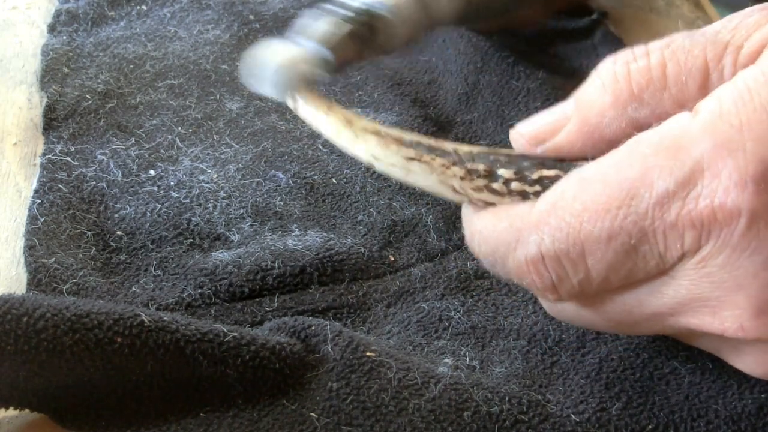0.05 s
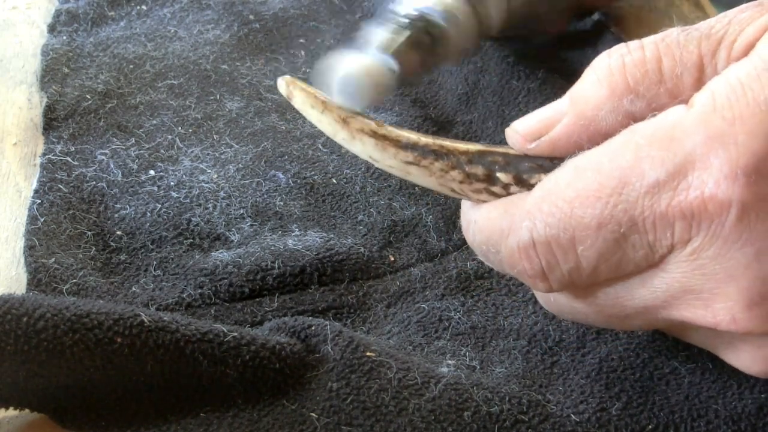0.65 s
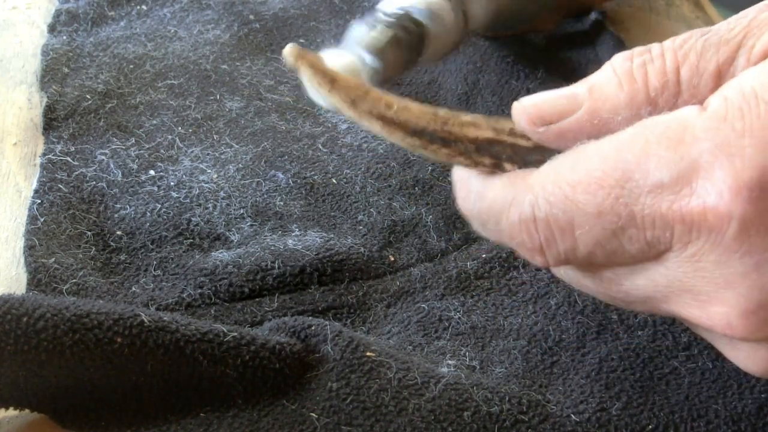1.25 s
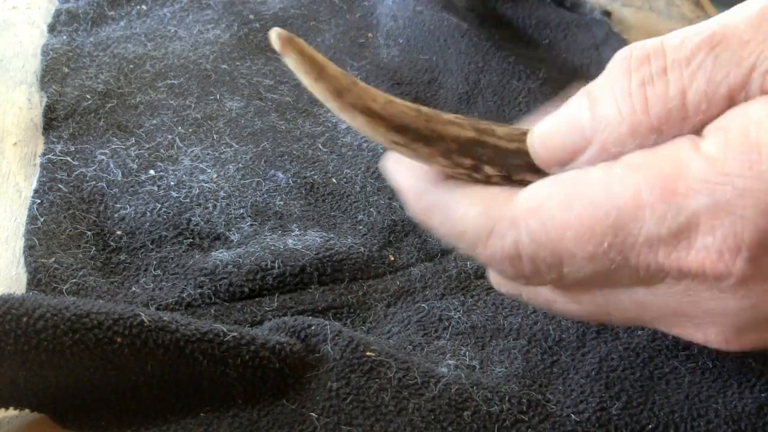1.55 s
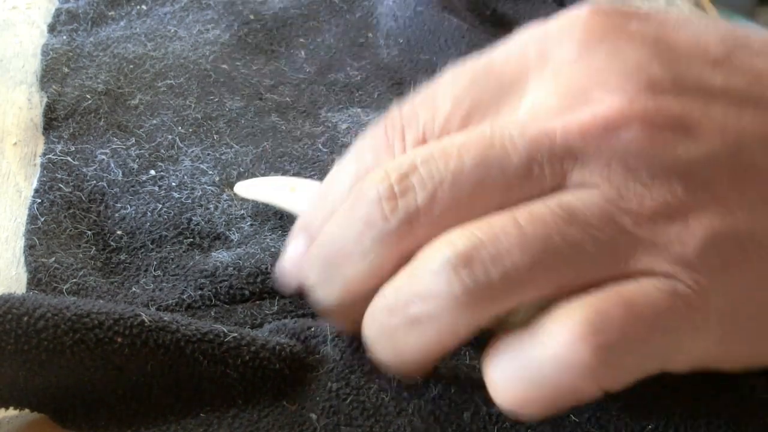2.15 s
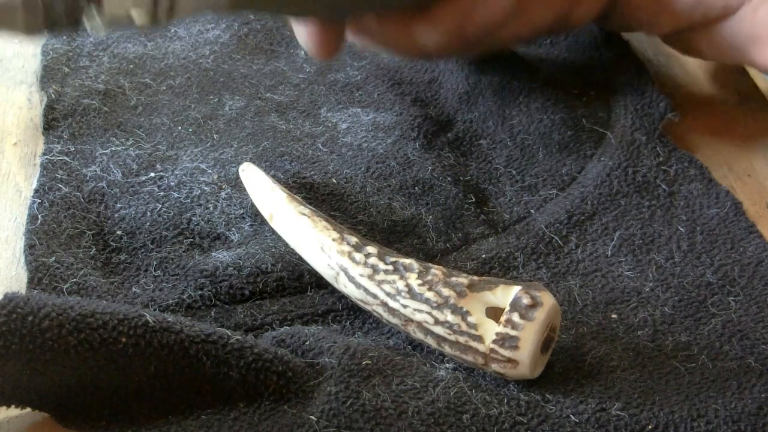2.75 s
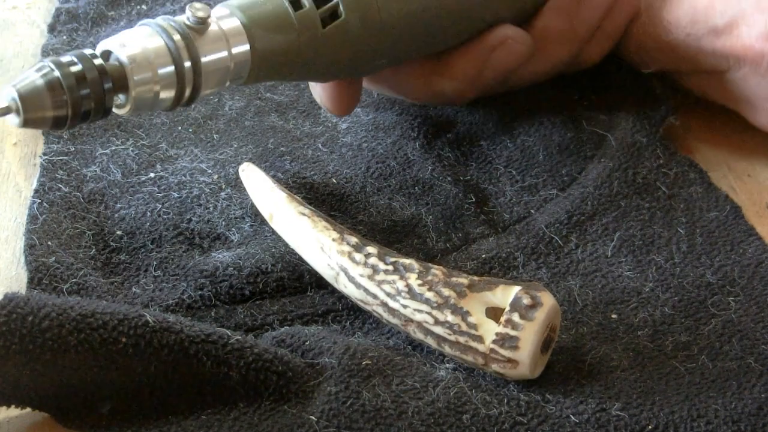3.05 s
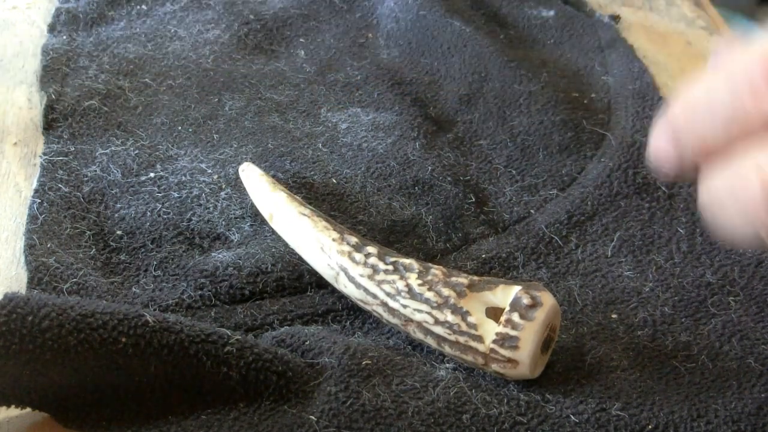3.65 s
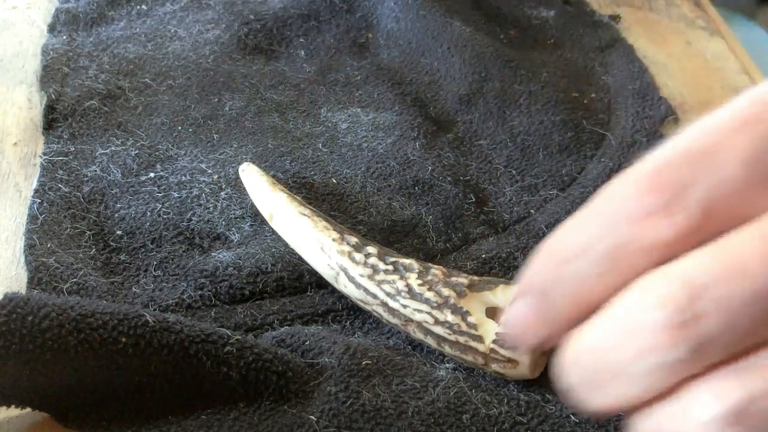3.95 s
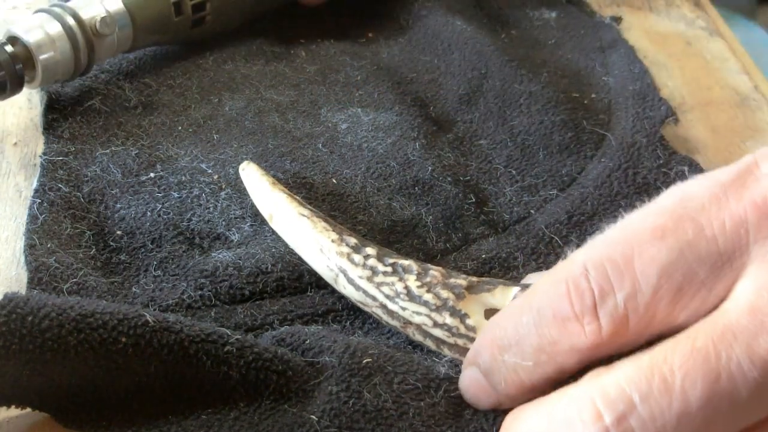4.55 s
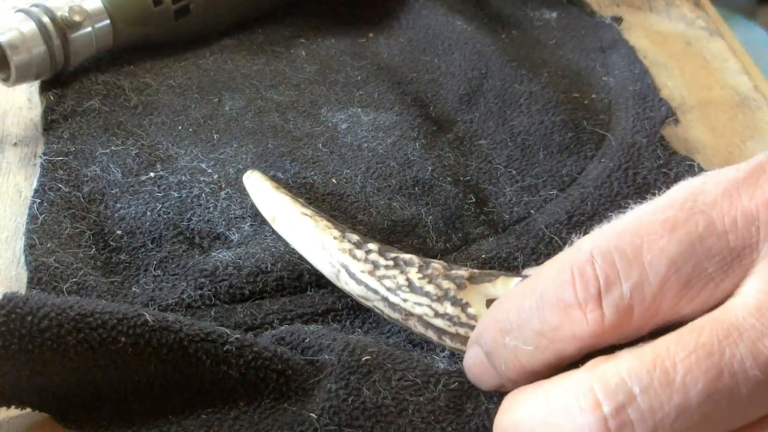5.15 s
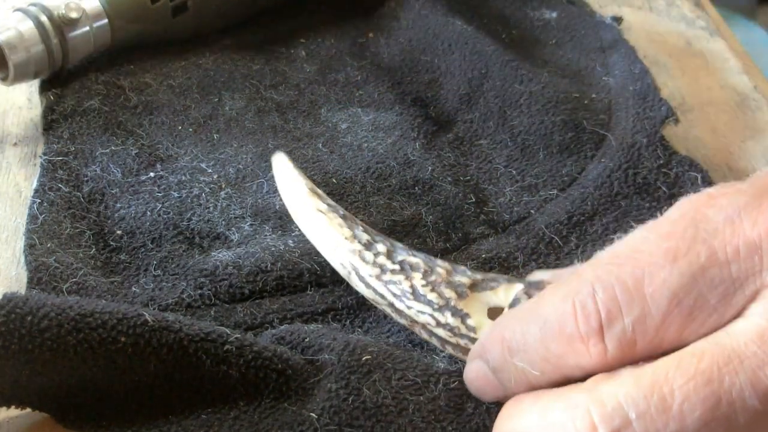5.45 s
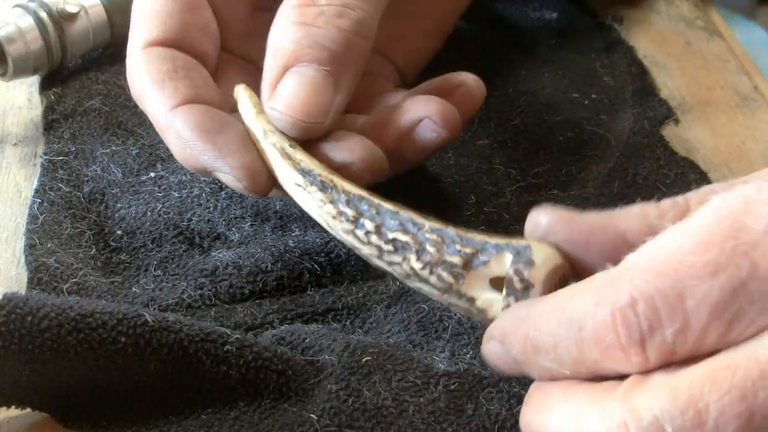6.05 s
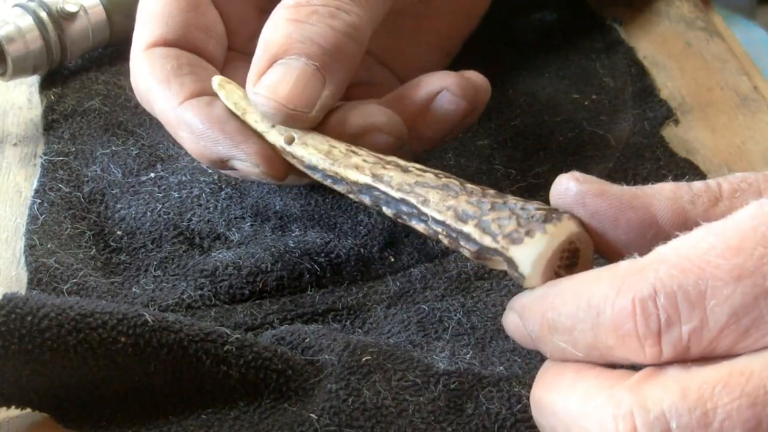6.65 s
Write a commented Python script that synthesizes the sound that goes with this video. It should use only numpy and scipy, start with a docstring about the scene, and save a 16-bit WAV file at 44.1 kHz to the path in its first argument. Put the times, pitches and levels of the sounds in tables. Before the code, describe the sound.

A small handheld rotary tool whines steadily with an electric buzz, its bit scraping against antler. It is lifted off and keeps running free while the antler is put down with a few soft knocks on a padded bench. A switch snaps, and the motor coasts to a stop, its whine sliding down over a fading rattle. A soft bump and a faint tick follow. Heard close in a quiet room.

```python
"""A small rotary tool grinds an antler tip: rotor whine, mains buzz, scraping bit, cooling air.
By 2 s it is lifted off and runs free; the antler is put down on a padded bench, whose top rings.
At 3.07 s the switch snaps off. The rotor coasts to rest, its loose shaft knocking and the
commutator's whine sliding down through the housing's resonances.
At 5.3 s the antler is picked up in the quiet room; at 6.7 s a fingernail ticks on it."""
import sys
import numpy as np
from scipy import signal
from scipy.fft import rfft, irfft, next_fast_len
from scipy.io import wavfile

SR = 44100
rng = np.random.default_rng(int(sys.argv[2]) if len(sys.argv) > 2 else 0)


def dump_mix(stems):
    """Bounce the given channels to the path in sys.argv[1] as a 16-bit WAV at rate SR."""
    frames = np.atleast_2d(stems).T  # one column per channel
    limited = np.clip(frames, -1, 1)  # hard clip at full scale
    pcm = np.round(limited * 32767).astype(np.int16)
    wavfile.write(sys.argv[1], SR, pcm)


N = 305158
TIME = np.arange(N) / SR
SWITCH_S = 3.0672


def from_db(db):
    """Decibels to gain."""
    return 10 ** (np.asarray(db) / 20)


def rms_one(x):
    """Scale to rms 1."""
    return x / np.sqrt(np.mean(x ** 2) + 1e-20)


def in_time(rows):
    """Each column after t/s, interpolated to every sample."""
    t_s, *columns = np.transpose(rows)
    return [np.interp(TIME, t_s, column) for column in columns]


def at_hz(spectrum, hz):
    """Level/dB of a spectrum, interpolated over log frequency."""
    points_hz, levels_db = np.transpose(spectrum)
    return np.interp(np.log(np.maximum(hz, 1)), np.log(points_hz), levels_db)


def drift(rate_hz):
    """Straight lines between unit normal draws, rate_hz of them a second."""
    knots = rng.standard_normal(4096)
    return np.interp(TIME * rate_hz, np.arange(len(knots)), knots)


def colour(x, spectrum, low_hz=10, high_hz=SR / 2):
    """Filter x by a spectrum between two steep edges; rms 1."""
    size = next_fast_len(N)
    hz = np.arange(size // 2 + 1) * SR / size + 1
    edges = 1 / np.sqrt((1 + (low_hz / hz) ** 16) * (1 + (hz / high_hz) ** 16))
    shaped = rfft(x, size) * from_db(at_hz(spectrum, hz)) * edges
    return rms_one(irfft(shaped, size)[..., :N])


def stereo_noise(side_db):
    """White mid/side noise; rms 1."""
    mid, side = rng.standard_normal((2, N))
    return rms_one(mid + from_db(side_db) * side * [[1], [-1]])


def ring(force, modes):
    """Damped modes of alternating sign, driven by one force."""
    out = np.zeros(N)
    for k, (hz, db, t60_s) in enumerate(modes):
        radius, angle = from_db(-60 / (t60_s * SR)), 2 * np.pi * hz / SR
        poles = [1, -2 * radius * np.cos(angle), radius ** 2]
        out += (-1) ** k * from_db(db) * signal.lfilter([0, np.sin(angle)], poles, force + 1e-18)
    return out


def clicks(rows, start_s=0):
    """One impulse per row of t/s, level/dB."""
    out = np.zeros(N)
    for t_s, db in rows:
        out[round((start_s + t_s) * SR)] += from_db(db)
    return out


def partial(turns, order, scatter_cycles=1):
    """Sine locked to a multiple of the rotor speed, at a random phase."""
    cycles = (order * turns + scatter_cycles * rng.random()) % 1
    return np.sin((2 * np.pi * cycles).astype(np.float32))


def once_a_turn(turns):
    """Rough waveform that recurs every turn; rms 1."""
    size = 256
    pattern = irfft(np.exp(2j * np.pi * rng.random(size // 2 + 1)))
    return rms_one(np.interp(turns % 1 * size, np.arange(size), pattern))


def rotor():
    """Speed/Hz and turns made: steady under power, then slowed by friction."""
    # rotor speed, driven and coasting: t/s, f/Hz
    driven = [(0.0, 285.8), (0.05, 289.9), (0.1, 294.8), (0.2, 297.7), (0.3, 300.7), (0.4, 303.2),
              (0.5, 302.3), (0.6, 303.5), (0.7, 301.6), (0.8, 300.9), (0.9, 302.6), (1.0, 304.5),
              (1.1, 305.2), (1.2, 302.5), (1.3, 301.9), (1.4, 302.6), (1.5, 303.9), (1.6, 304.7),
              (1.7, 304.8), (1.8, 305.1), (1.9, 305.0), (2.0, 305.3), (2.1, 304.9), (2.2, 304.8),
              (2.3, 304.4), (2.4, 305.2), (2.5, 305.2), (2.6, 305.3), (2.7, 304.8), (2.8, 305.1),
              (2.9, 304.9), (3.0, 305.1), (3.06, 304.1)]
    stopping = [(3.07, 305), (3.2, 276.9), (3.4, 240.1), (3.6, 208), (3.8, 177.5), (4.0, 148.8),
                (4.2, 120.7), (4.4, 94.1), (4.6, 68.7), (4.8, 44.8), (4.95, 27.2), (5.19, 0)]
    speed_hz = np.maximum(in_time(list(driven) + list(stopping))[0], 0)
    return speed_hz, np.cumsum(speed_hz * (1 + 0.00088 * drift(60))) / SR


def rattle(turns, depth, uneven_db):
    """Envelope of the shaft's chatter: a burst each turn, no two alike."""
    strength = from_db(uneven_db * rng.standard_normal(4096))[turns.astype(int)]
    return 1 + depth * strength * np.exp(-(turns % 1) / 0.21)


def whine(turns, load):
    """Rotor orders under power; pressing the bit shifts their balance and makes the shaft flutter."""
    # strongest multiples of the rotor speed: order
    strong_orders = (1, 3, 5, 6, 7, 8, 9, 11, 13, 16)
    # their swell as the tool turns in the hand: t/s, relative level/dB per order
    strong_levels = [(0.0, -46, -46, -52, -36.5, -41, -52, -47, -59, -41, -49),
                     (0.13, -48, -45.5, -53, -35, -39, -39, -38.5, -44, -39, -59),
                     (0.25, -44.5, -40.5, -51, -37, -41, -38.5, -42, -60, -38.5, -41),
                     (0.38, -52, -36, -36, -37, -39, -32, -45, -41, -38, -47),
                     (0.51, -49.5, -39, -56, -37.5, -39, -31, -41, -44, -39.5, -51),
                     (0.63, -47, -38.5, -49, -33.5, -36, -31.5, -45, -43, -36, -42),
                     (0.76, -52, -40, -50, -38, -38.5, -44, -48, -42, -37.5, -46),
                     (0.89, -52.5, -37, -45, -40, -49, -33, -44, -43, -40, -47),
                     (1.01, -51, -38.5, -45, -36.5, -39, -35.5, -42, -43, -36, -37),
                     (1.14, -43, -37.5, -58, -35, -39, -33.5, -40, -42, -39.5, -57),
                     (1.27, -47, -38, -44, -43, -35, -33.5, -40, -43, -45, -42),
                     (1.39, -47, -38.5, -45, -44, -36, -36, -42, -40, -44, -52),
                     (1.52, -56, -42.5, -41, -42, -47, -35.5, -36.5, -37, -48, -61),
                     (1.65, -50, -40, -43, -42, -41, -34.5, -40, -37, -44, -58),
                     (1.77, -50, -43, -39.5, -47, -44, -33.5, -40.5, -44, -36, -44),
                     (1.9, -55, -42, -35.5, -45, -43, -32.5, -39, -41, -37.5, -42),
                     (2.03, -50, -43.5, -36.5, -50, -43, -31, -33.5, -40, -37, -39.5),
                     (2.15, -48, -43.5, -36.5, -49, -49, -29.5, -33, -39, -39, -44),
                     (2.28, -49, -43.5, -37, -51, -56, -31.5, -31.5, -43, -37.5, -41),
                     (2.41, -53, -43, -34.5, -45, -44, -34, -31, -38, -38, -36),
                     (2.53, -53, -43, -35, -46, -42, -31, -34, -40, -37, -35.5),
                     (2.66, -51.5, -39.5, -34.5, -45, -40, -34.5, -34, -36.5, -39, -37.5),
                     (2.79, -47, -41.5, -33, -45.5, -40, -33, -30.5, -37, -49, -39.5),
                     (2.91, -49, -42, -33.5, -35.5, -43, -42, -37, -45, -50, -43),
                     (3.04, -48, -44, -34, -44, -42, -53, -39, -45, -49, -51)]
    # weaker multiples: order, relative level/dB loaded, relative level/dB free
    weak_orders = [(2, -49.5, -53), (4, -48, -50), (10, -59, -50.5), (12, -40.5, -44), (14, -44, -44.5),
                   (15, -46, -49.5), (17, -49.5, -48.5), (18, -54.5, -53.5), (19, -52, -50.5),
                   (20, -55.5, -61), (21, -55, -63.5), (23, -64, -61), (24, -64, -52), (26, -67, -57),
                   (30, -60, -67), (32, -55, -53), (33, -51, -45), (34, -63, -59), (35, -57, -63),
                   (36, -53.5, -54.5), (37, -58.5, -53), (38, -51.5, -63), (39, -69, -59), (40, -75, -48.5),
                   (42, -62, -62.5), (47, -65.5, -61), (48, -54, -56), (49, -61.5, -52)]
    out = 0
    for order, db in zip(strong_orders, in_time(strong_levels)):
        depth = (0.62 if order == 1 else 0.15) * load  # the imbalance tone flutters most
        flutter = (1 + depth * drift(55)) / np.sqrt(1 + depth ** 2 / 2)
        out += from_db(db + 2.06) * flutter * partial(turns, order)
    for order, loaded_db, free_db in weak_orders:
        db = load * loaded_db + (1 - load) * free_db + 1.04 + 3.5 * drift(9)
        out += from_db(db) * partial(turns, round(order), scatter_cycles=0.52)
    return out


def powered_tool(turns):
    """Scrape of bit and bearings, hiss of cooling air, mains buzz and hum, plus the whine."""
    # pressure of bit on antler: t/s, load/0-1
    pressure = [(0, 0.98), (1.33, 1), (1.48, 0.73), (1.75, .1), (2.0, 0.05)]
    # noise swells, grinding first, then running free: t/s, relative level/dB of scrape, rasp, hiss
    scraping = [(0.02, -39.5, -38.5, -43), (0.07, -41.5, -38, -46), (0.12, -42, -44, -46),
                (0.17, -42, -44, -44), (0.22, -46, -47, -47), (0.27, -46, -43.5, -43.5),
                (0.32, -45, -51, -43), (0.37, -43, -40, -41), (0.42, -40, -52, -45.0),
                (0.47, -41, -44, -43.5), (0.52, -39.0, -36, -42), (0.57, -41, -40.0, -41.5),
                (0.62, -41.5, -42, -41.5), (0.67, -43, -44, -41), (0.72, -39, -39, -42),
                (0.77, -38.5, -41.5, -41), (0.82, -37, -43, -44.5), (0.87, -58, -47, -44.5),
                (0.92, -38, -43, -42), (0.97, -41, -39, -43), (1.02, -41.5, -39, -40.5),
                (1.07, -40.5, -40, -41.5), (1.12, -41.5, -58, -44.5), (1.17, -39.5, -34.5, -40),
                (1.22, -43, -44.5, -41.5), (1.27, -42, -41, -41), (1.32, -39.5, -38.5, -42),
                (1.37, -47, -51, -45), (1.42, -40.5, -50.5, -45.0), (1.47, -45, -44, -45.5),
                (1.52, -42.5, -43, -45.0), (1.57, -47, -43, -45.5), (1.65, -42, -47.5, -46.5),
                (1.74, -44, -41, -44), (1.83, -40, -44, -45.5), (1.92, -43, -44, -43),
                (2.01, -39, -42.5, -44.5), (2.1, -39, -47.5, -46), (2.19, -40.5, -43, -45.5),
                (2.28, -37, -43, -46.5), (2.37, -43.5, -40.5, -45.0), (2.46, -40, -39.5, -46.5),
                (2.55, -38.5, -39.5, -43.5), (2.64, -37.5, -43, -45.5), (2.73, -41, -39.5, -41),
                (2.82, -38.5, -44.5, -44), (2.91, -39.5, -43.5, -43), (3.0, -41, -38, -45.0)]
    # noise spectra, grinding and running free: f/Hz, level/dB
    grinding = [(150, -5), (450, -22), (750, -10.5), (1150, -12.5), (1600, -6.5), (2050, 3.5), (2500, -5),
                (3200, -6), (3900, -2), (5500, -9), (7400, -8.5), (8600, -17), (10300, -7), (15000, -12)]
    free = [(150, -17.5), (450, -25), (750, -11.5), (1150, -16.5), (1600, -10), (2050, -12), (2500, 3.5),
            (3200, -5), (3900, -4), (5500, -11), (7400, -14), (8600, -23.5), (10300, -17), (15000, -22.5)]
    # hum of the pulling motor: t/s, level/dB
    hum = [(0.0, -47), (0.074, -52), (0.402, -60.5), (0.528, -51.5), (0.598, -58), (0.898, -55),
           (0.988, -64), (1.074, -73), (1.232, -52.5), (1.322, -62), (1.38, -59), (1.55, -79), (1.614, -69),
           (1.72, -73), (1.9, -74)]
    ripple_hz = 100  # twice the mains frequency
    skid_s, skid_db, skid_half_width_s = 0.742, 4.8, 0.02  # the bit skids over the tip
    load = np.clip(in_time(pressure)[0], 0, 1)
    scrape_db, rasp_db, hiss_db = in_time(scraping)
    ripple_rad = 2 * np.pi * ripple_hz * TIME

    def band(x, low_hz, high_hz):
        """A band of x, its colour crossfaded by the load."""
        loaded = np.sqrt(load) * colour(x, grinding, low_hz, high_hz)
        return loaded + np.sqrt(1 - load) * colour(x, free, low_hz, high_hz)

    bursts = rattle(turns, depth=2.1, uneven_db=1.5) * from_db(drift(35.1))
    throb = from_db(2.55 * (1 + 0.75 * drift(12)) * np.cos(ripple_rad))
    skid = from_db(skid_db * np.exp(-((TIME - skid_s) / skid_half_width_s) ** 2))
    chatter = bursts * throb * skid * stereo_noise(side_db=-13.5)
    air = rattle(turns, depth=0.58, uneven_db=4.0) * from_db(drift(30)) * stereo_noise(side_db=-7)
    out = from_db(scrape_db + 0.35) * band(chatter, 250, 2780)
    out += from_db(rasp_db - 0.3) * band(chatter, 3270, 7630)
    out += from_db(hiss_db + 1.65) * band(air, 7270, 16400)
    # torque pulses with the mains: sidebands around every order
    buzz = bursts * once_a_turn(turns) * (np.cos(ripple_rad) + 1.07 * np.sin(2 * ripple_rad))
    out += from_db(-37 - 2.3 * load) * band(buzz, 590, 6400)
    out += from_db(in_time(hum)[0]) * np.sin(ripple_rad)
    return out + whine(turns, load)


def room(x, t60_s=0.2, wet_db=-20, tone_db=-60.06):
    """Add a faint diffuse tail, different at each ear, and steady room tone."""
    # room tone: f/Hz, relative level/dB
    spectrum = [(15, -40), (25, -0.5), (82, -9), (136, -11), (173, -12.5), (227, -13), (260, -12),
                (305, -12.5), (523, -13), (1270, -22), (1570, -20), (7700, -30), (10900, -26.5),
                (15500, -34)]
    t_s = TIME[:SR // 3]
    tail = rng.standard_normal((2, len(t_s))) * from_db(-60 * t_s / t60_s) * (t_s > 0.004)
    tail /= np.sqrt(np.sum(tail ** 2, axis=1, keepdims=True))
    reverb = from_db(wet_db) * signal.fftconvolve(x, tail, axes=1)[:, :N]
    return x + reverb + from_db(tone_db) * colour(stereo_noise(side_db=-4.5), spectrum)


def bench():
    """The antler's soft pushes through the cloth set the bench top ringing."""
    # contacts: t/s, level/dB, width/s
    bumps = [(2.086, -23, 0.00065), (2.094, -30, 0.00074), (2.099, -20.5, 0.00087), (2.12, -26, 0.00092),
             (2.148, -25, 0.0012), (5.289, -38.5, 0.0078), (5.61, -59, .005)]
    # bench top: f/Hz, level/dB, t60/s
    modes = [(62.4, -30, .2), (98, -6.5, 0.18), (132, -11.5, 0.042), (206, -12.5, 0.079),
             (316, -6.5, 0.046), (455, -8.5, 0.12), (627, -2, 0.036), (983, 7, 0.024)]
    force = np.zeros(N)
    for t_s, db, width_s in bumps:
        push = np.exp(-np.minimum(((TIME - t_s) / (width_s / 2)) ** 2, 100))
        force += from_db(db) * push / push.sum()
    return ring(force, modes)


def switch():
    """Quick snaps ring the switch."""
    # snaps: t/s after SWITCH_S, level/dB
    snaps = [(0, -8), (.0005, 1), (.012, -18)]
    # switch: f/Hz, level/dB, t60/s
    modes = [(2080, -14, 0.0073), (2756, -8, 0.0049), (4080, -10, 0.0036), (5750, -11.5, 0.0038),
             (7400, -6, .0035), (11500, -10, .002), (14500, -14, 0.0035)]
    return ring(clicks(snaps, SWITCH_S), modes)


def coasting_tool(turns, speed_hz):
    """Orders slide down through the housing's resonances, over dying rattle, hiss and knocks."""
    # imbalance and multiples of the twelve commutator bars: order
    sliding_whine_orders = (1, 12, 24, 36, 48)
    # their swell: t/s, relative level/dB per order
    sliding_whine_levels = [(3.09, -57.5, -49, -77, -69, -64), (3.152, -57, -42, -60, -57, -71),
                            (3.22, -59, -56, -54, -64, -74), (3.29, -59, -53, -54, -63, -67),
                            (3.36, -63, -45, -62, -72, -57), (3.43, -70, -51, -58, -70, -68),
                            (3.5, -73, -37, -60, -72, -67), (3.57, -70, -37, -63, -57, -66),
                            (3.64, -69, -33.5, -52, -62, -72), (3.71, -76, -38, -52, -69, -68),
                            (3.78, -68, -39, -51, -63, -68), (3.85, -69, -36, -62, -64, -62),
                            (3.92, -61, -57, -55, -57, -59), (3.99, -70, -56, -60, -67, -64),
                            (4.06, -61, -63, -55, -55, -61), (4.13, -58, -76, -60, -58, -69),
                            (4.2, -73, -72, -56, -59, -67), (4.27, -64, -70, -53, -66, -61),
                            (4.34, -65, -64, -42, -69, -67), (4.41, -54, -71, -49, -69, -67),
                            (4.48, -68, -63, -44, -69, -76), (4.55, -74, -69, -64, -60, -70),
                            (4.62, -71, -74, -64, -49, -68), (4.69, -71, -69, -68, -53, -68),
                            (4.76, -71, -85, -67, -66, -66), (4.83, -70, -82, -74, -74, -65),
                            (4.9, -76, -79, -74, -71, -74)]
    # other multiples, at a speed of reference_hz: order, relative level/dB
    fading_rotor_harmonics = [(2, -72.5), (3, -52), (4, -57), (5, -52.5), (6, -54.5), (7, -50), (8, -57),
                              (9, -48), (10, -52), (11, -57.5), (13, -57), (14, -53), (15, -49), (16, -49),
                              (17, -56.5), (18, -61), (19, -68), (20, -62)]
    # dying noise: t/s, relative level/dB of rattle, air hiss
    fading = [(3.09, -39.5, -46), (3.19, -37.5, -46.5), (3.19, -42.5, -48.5), (3.38, -42, -48.5),
              (3.41, -42.5, -49.5), (3.5, -42.5, -47.5), (3.54, -47, -50), (3.57, -40.5, -49),
              (3.66, -44.5, -52), (3.74, -46.5, -51), (3.88, -50, -53.5), (4.09, -52.5, -54),
              (4.29, -52, -56), (4.45, -51, -54.5), (4.84, -53, -62), (5.03, -60, -69.5), (5.19, -68, -85),
              (5.2, -88, -82)]
    # colour of the coasting tool: f/Hz, level/dB
    body = [(150, -20), (450, -34), (750, -11.5), (1150, -15.5), (1600, -9.5), (2050, -4), (2500, 0.5),
            (3200, -10.5), (3900, -6), (5500, -11.5), (7400, -21.5), (8600, -27), (10300, -20.5),
            (15000, -27)]
    reference_hz = 265
    relative_speed = speed_hz / reference_hz
    rattle_db, hiss_db = in_time(fading)
    tones = 0
    for order, db in zip(sliding_whine_orders, in_time(sliding_whine_levels)):
        tones += from_db(db + 2.9) * partial(turns, order)
    tones *= np.clip(speed_hz / 55, 0, 1) ** 2
    for order, db in fading_rotor_harmonics:
        body_db = at_hz(body, order * speed_hz) - at_hz(body, order * reference_hz)
        gain = from_db(db + 0.7 * body_db + 4.1 * drift(7.8) + 0.5) * relative_speed ** 1.83
        tones += gain * partial(turns, round(order))
    for order in (60, 72, 84):  # upper commutator harmonics
        gain = from_db(hiss_db - 17 + 3.4 * drift(7.2)) * np.clip(speed_hz / 100, 0, 1)
        tones += gain * (order * speed_hz < SR / 2) * partial(turns, order)
    bursts = rattle(turns, depth=0.59, uneven_db=5.0)
    chatter = bursts * (stereo_noise(side_db=-21) + 0.96 * relative_speed * once_a_turn(turns))
    puffs = rattle(turns, depth=0.64, uneven_db=1.5)
    air = puffs * (stereo_noise(side_db=-7) + 0.57 * once_a_turn(turns))
    noise = from_db(rattle_db - 0.34) * colour(chatter, body, low_hz=200, high_hz=7500)
    noise += from_db(hiss_db + 0.5) * colour(air, body, low_hz=7240)
    return (tones + noise + shaft_knocks(turns)) * np.clip(speed_hz / 16, 0, 1)


def shaft_knocks(turns):
    """The loose shaft knocks once a turn and rings the housing."""
    # knock strength: t/s, level/dB
    knocking = [(3.08, -53), (3.25, -62), (3.4, -37), (3.45, -34), (3.51, -37), (3.59, -30.5),
                (3.63, -37.5), (3.78, -39.5), (3.9, -55), (4.4, -42.5), (4.8, -55), (5.0, -70)]
    # housing: f/Hz, level/dB, t60/s
    modes = [(775, -17.5, 0.037), (2090, -2, 0.012), (2360, 2, .012), (3640, 0.5, 0.0036),
             (5200, -6.5, 0.0066), (7840, -10.5, 0.0044)]
    new_turn = np.diff(np.floor(turns), prepend=0)
    return ring(new_turn * from_db(in_time(knocking)[0] + 1.1 * rng.standard_normal(N)), modes)


def fingernail():
    """One tick of a nail rings the antler."""
    # tick: t/s, level/dB
    ticks = [(6.7157, -45)]
    # antler: f/Hz, level/dB, t60/s
    modes = [(300, -7, 0.028), (1400, -5, .012), (3270, -1, .018), (4700, -14, .006)]
    return ring(clicks(ticks), modes)


def scene():
    """Tool and handling sounds, a little to the left in the quiet room."""
    pan_db, power_decay_s = 1.3, 0.021
    speed_hz, turns = rotor()
    power = np.exp(-np.maximum(TIME - SWITCH_S, 0) / power_decay_s)
    tool = power * powered_tool(turns) + np.sqrt(1 - power ** 2) * coasting_tool(turns, speed_hz)
    handling = bench() + switch() + fingernail()
    return room((tool + handling) * from_db([[pan_db], [-pan_db]]))


def record(dry):
    """Clip at full scale, then low-pass steeply."""
    cutoff_hz = 15900
    lowpass = signal.ellip(10, 0.1, 80, cutoff_hz, fs=SR, output="sos")
    return signal.sosfilt(lowpass, np.clip(dry, -1, 1))


dry = scene()
out = record(dry)
dump_mix(out)
```